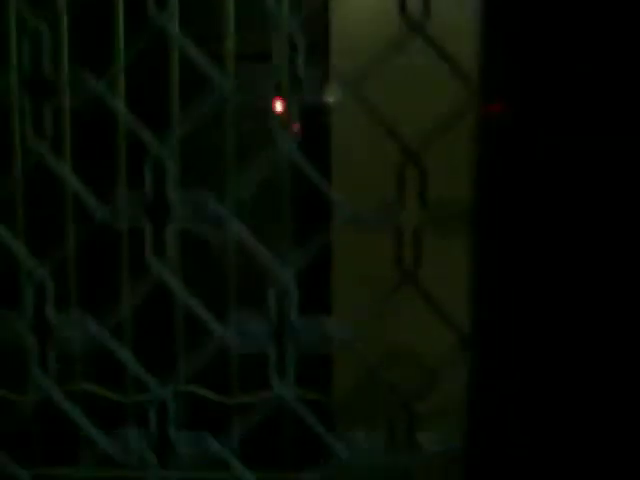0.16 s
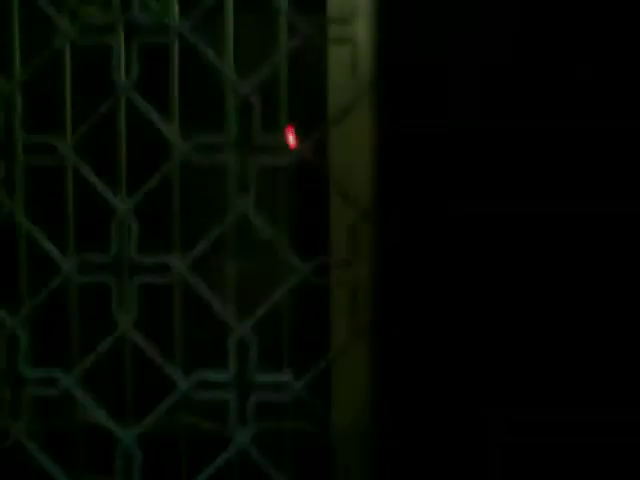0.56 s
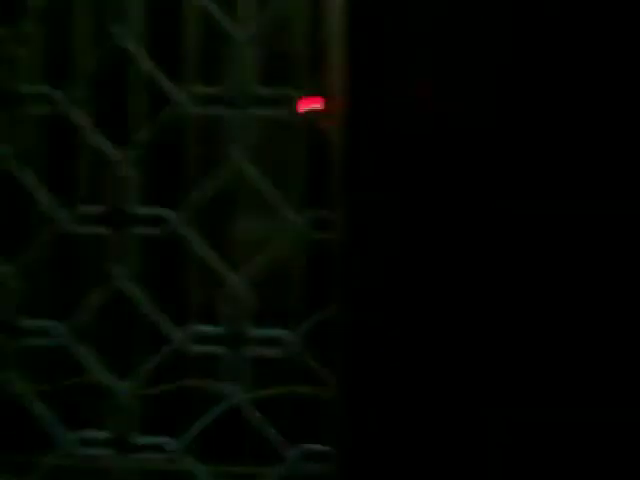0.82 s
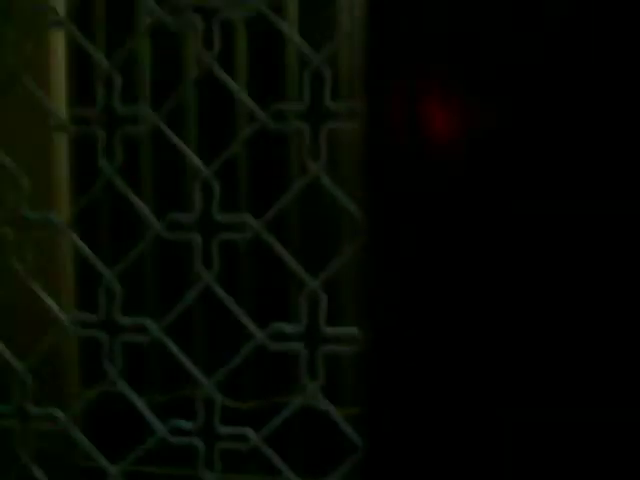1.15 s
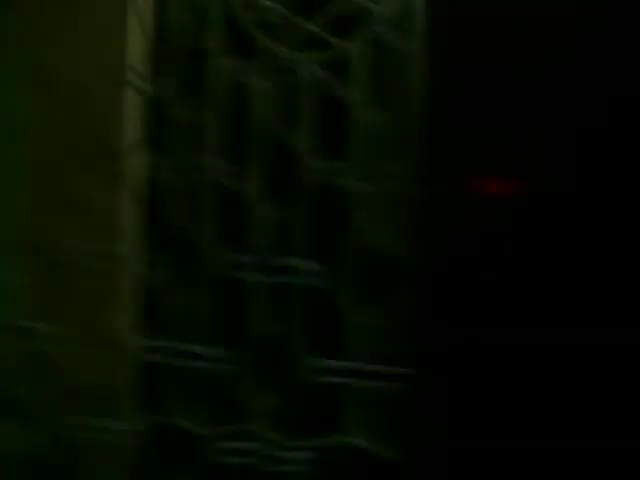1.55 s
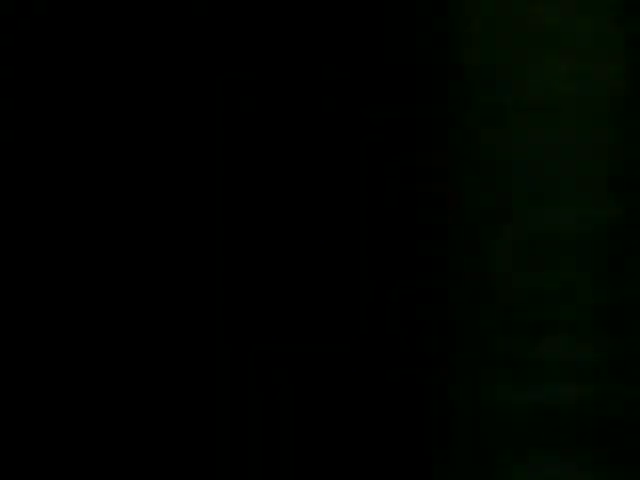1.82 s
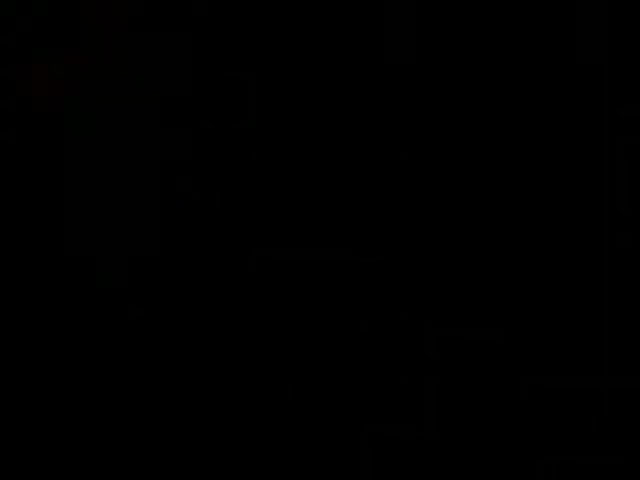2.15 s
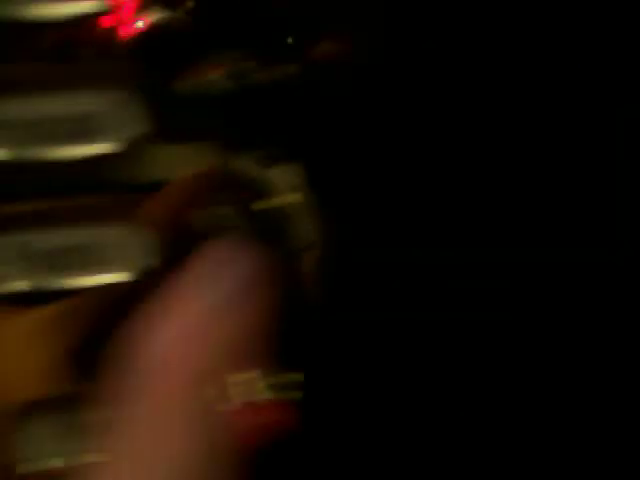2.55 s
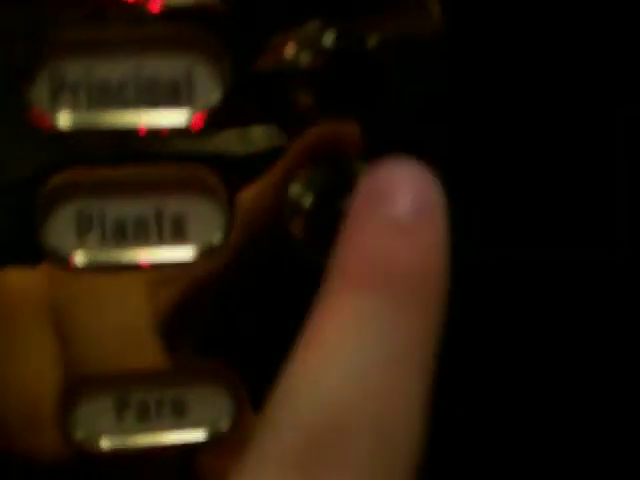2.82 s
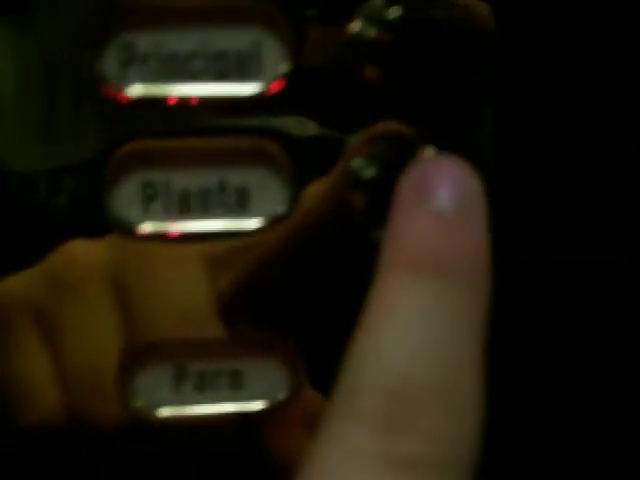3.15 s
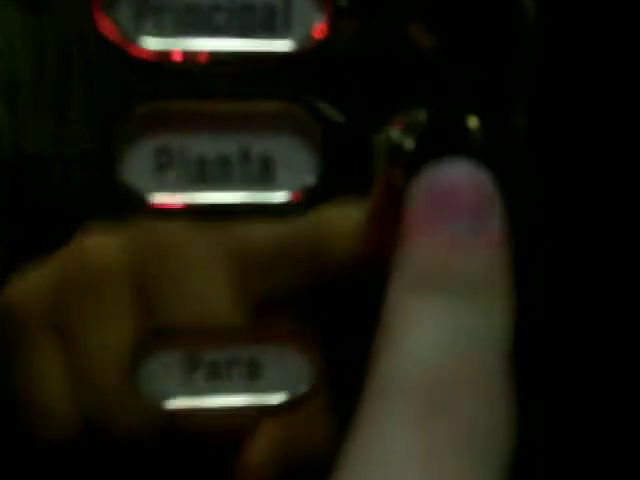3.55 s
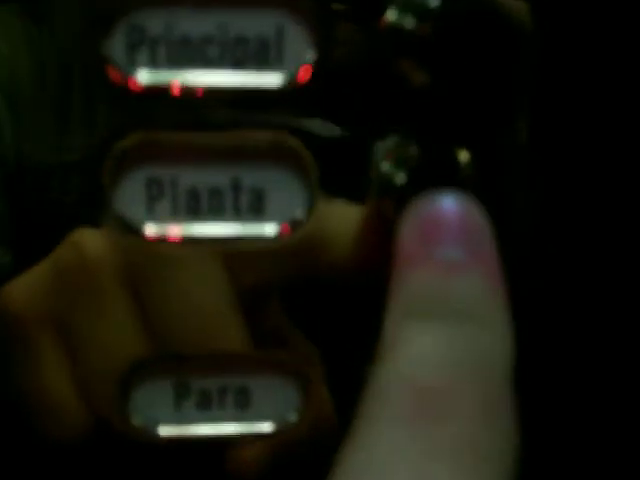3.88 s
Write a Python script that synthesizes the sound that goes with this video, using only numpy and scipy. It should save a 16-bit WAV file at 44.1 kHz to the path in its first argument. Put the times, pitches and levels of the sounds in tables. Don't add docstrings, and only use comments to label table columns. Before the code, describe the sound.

An old lift cabin rumbles low while its lattice gate rattles, thuds and scrapes shut; the noise dies to near quiet, then a button clicks and a relay clunks, heard close on a small, dull hand-held microphone.

```python
import sys
import numpy as np
from scipy import signal
from scipy.fft import rfft, irfft, next_fast_len
from scipy.io import wavfile
from scipy.ndimage import map_coordinates

SR = 44100
rng = np.random.default_rng(int(sys.argv[2]) if len(sys.argv) > 2 else 0)


def waveform_to_disk(signal):
    frames = np.transpose(np.atleast_2d(signal))
    scaled = np.clip(frames, -1, 1) * 32767
    samples = np.round(scaled).astype(np.int16)
    wavfile.write(sys.argv[1], SR, samples)


def rack_gain(trim_db):
    fader = np.asarray(trim_db, float)
    return 10 ** (fader / 20)


N = 176400

# centre in Hz, width in Hz, level in dB.
PANELS = [(221.6, 46, -5.5), (277, 6.2, 0), (330.7, 5, -3), (362.3, 2.6, -6), (395, 22, -8.5),
          (490, 61, -9), (580.6, 34, -7.5), (712, 71, -14), (810, 8.4, -7.5), (911, 130, -14.5),
          (1126, 12, -16)]
# centre in Hz, width in Hz, level in dB.
LOW_PANELS = [(53, 14, 2), (98, 11.6, 4), (136, 7.2, 0.5), (164.9, 3.5, 3.5)]
# start in seconds, peak in dB.
RELAY_HITS = [
    (3.389, -10.5),
    (3.407, -20.5),
    (3.428, -16.5),
]
# time in seconds, signed size in full scale, gain dip in dB.
BUMPS = [
    (0.16, -0.22, 0.5),
    (0.234, -.45, 4.5),
    (0.32, 0.47, 1),
    (0.488, -0.48, 2),
    (0.578, 0.11, 1),
    (0.605, -0.27, 0),
    (0.649, 0.11, -1),
    (0.833, 0.29, 1.5),
]


def unit(x):
    return x / np.sqrt(np.mean(x ** 2) + 1e-20)


def along(points, hz):
    f, v = np.transpose(points)
    return np.interp(np.log(hz + 1), np.log(f + 1), v)


def curve(rows):
    s, *cols = np.transpose(rows)
    return [np.interp(np.arange(N) / SR, s, v) for v in cols]


def wobble(rate_hz):
    knots = rng.standard_normal(int(N * rate_hz / SR) + 4)
    return map_coordinates(knots, [np.arange(N) * rate_hz / SR])


def filtered(x, response):
    m = next_fast_len(len(x) + SR // 2)
    return irfft(rfft(x, m) * response(np.fft.rfftfreq(m, 1 / SR)), m)[:len(x)]


def body(peaks):
    def response(f):
        return sum((-1) ** k * rack_gain(db) * 1j * f * w / (c * c - f * f + 1j * f * w)
                   for k, (c, w, db) in enumerate(peaks))
    return response


def noise(response):
    return unit(filtered(rng.standard_normal(N), response))


def dying(response, t60s, rise_s):
    t = np.arange(SR // 2) / SR
    burst = unit(filtered(rng.standard_normal(len(t)), response))
    hz, frame_s, z = signal.stft(burst, SR, nperseg=512)
    decay = rack_gain(-60 * frame_s / along(t60s, hz)[:, None])
    tail = signal.istft(z * decay, SR, nperseg=512)[1][:len(t)]
    return tail * (1 - np.exp(-t / rise_s))


def add(out, s, x):
    i = round(s * SR)
    out[i:i + len(x)] += x[:N - i]


def still_air():
    # frequency in Hz, level in dB per Hz.
    air_tone = [(88, -33), (150, -24.5), (415, -21.5), (735, -1), (913, -5), (4340, -13), (6000, -17),
                (7800, -74.5), (13200, -120)]
    return rack_gain(-48 + 0.19 * wobble(4.0)) * noise(lambda f: rack_gain(along(air_tone, f)))


def winding_hum():
    # centre in Hz, width in Hz, rms in dB.
    hum_bands = [(100, 14, -43), (277, 1.8, -63)]
    return sum(rack_gain(db) * noise(lambda f: body([(hz, w, 0)])(f) ** 2) for hz, w, db in hum_bands)


def cabin_sway():
    # time in seconds, level in dB.
    sway_level = [(0, -18), (.05, -22), (.4, -15.5), (.63, -10), (.73, -18.5), (.83, -12), (.9, -20.5),
                  (1.0, -14), (1.3, -18.5), (1.93, -25), (2.18, -14.5), (2.27, -20.5), (2.56, -19.5),
                  (2.66, -28.5), (3.1, -26), (3.27, -34.5), (3.45, -28), (4, -27.5)]
    # centre in Hz, width in Hz, level in dB.
    sway_modes = [(8.5, 10, -4), (19, 6.3, 2), (30.35, 7.1, -1), (57.7, 14.4, -6)]
    level_db = curve(sway_level)[0]
    return rack_gain(level_db) * noise(lambda f: body(sway_modes)(f) / (1 + (f / 85) ** 4))


def handling():
    case_tap = (.09287, 4800, .00022, 1.25, .0933, .00025, 1.2)
    bump_rise_s, bump_fall_s = 0.004, 0.0008
    t = np.arange(N) / SR
    tap_s, hz, half_s, size, push_s, push_half_s, push_size = case_tap
    tap = size * np.cos(2 * np.pi * hz * (t - tap_s)) * np.exp(-((t - tap_s) / half_s) ** 2)
    push_rise = ((t - push_s) / push_half_s) ** 2
    push_fall = (t - push_s) / (2 * push_half_s)
    push = push_size * np.exp(-np.where(t < push_s, push_rise, push_fall))
    bumps = sum(g * np.exp(-np.abs(t - s) / np.where(t < s, bump_rise_s, bump_fall_s)) for s, g, _ in BUMPS)
    return tap + push + bumps


def ticks():
    # start in seconds, peak in dB, pitch in Hz, t60 in seconds.
    tick_events = [(0.5796, -31, 1500, 0.0044), (0.604, -28.5, 1200, .004), (.627, -30, 2520, 0.015),
                   (.832, -27, 1710, 0.0077), (0.909, -15.5, 3830, 0.0062), (0.912, -13.5, 725, 0.013),
                   (0.9351, -11, 2410, 0.011), (.935, -22.5, 1580, 0.0098), (1.126, -34.5, 2960, 0.0081),
                   (1.7236, -36, 777, 0.03), (2.0206, -29, 1480, 0.019), (2.024, -30.5, 785, 0.072),
                   (2.254, -32, 2486, 0.044), (2.8638, -32, 2830, 0.014), (2.867, -37, 4100, 0.076),
                   (2.867, -34.5, 1300, 0.04), (2.8905, -29.5, 4600, 0.0065)]
    crack_t60_s, tail_db, tail_t60_s = 0.005, -18, 0.092
    out, t = np.zeros(N), np.arange(SR // 8) / SR
    for s, db, hz, t60 in tick_events:
        ring = 0.81 * rack_gain(-60 * t / t60) * np.sin(2 * np.pi * hz * t)
        crack = 0.55 * (rng.standard_normal(len(t)) + 2 * (t < .0002)) * rack_gain(-60 * t / crack_t60_s)
        wash = unit(filtered(rng.standard_normal(len(t)), body([(hz, hz, 0)])))
        tail = rack_gain(tail_db - 60 * t / tail_t60_s) * wash
        add(out, s, rack_gain(db) * (ring + crack + tail))
    return out


def scrapes():
    # peak time in seconds, rise in seconds, fall in seconds, level in dB, centre in Hz.
    swells = [(0.022, 0.034, 0.34, -41.5, 2490), (.146, 0.0054, 0.04, -30, 4060),
              (0.301, 0.039, 0.018, -38.5, 4170), (.42, 0.12, 0.16, -39.5, 3900),
              (0.898, .05, 0.18, -41, 3500), (1.029, 0.052, 0.063, -45, 3460),
              (1.24, 0.033, 0.073, -42.5, 2900), (1.776, 0.045, 0.075, -40.5, 3360),
              (2.017, 0.0074, 0.17, -43.5, 2340), (2.274, 0.058, 0.081, -38.5, 2610),
              (1.79, 0.019, 0.036, -43, 805), (2.299, 0.094, 0.2, -42, 864), (2.9, 0.024, 0.027, -41, 2020)]
    # centre in Hz, width in Hz, level in dB.
    lattice_modes = [(1370, 320, 5.5), (2100, 140, -0.5), (2440, 94, 4), (3500, 81, -14.5), (3966, 39, 0.5),
                     (4240, 91, -9.5)]
    lattice_db, lattice_fade_db_per_s, grit_db = 2.5, 7.8, 2
    out, t = np.zeros(N), np.arange(N) / SR
    ring = noise(lambda f: np.abs(body(lattice_modes)(f)) ** 0.71)
    for s, rise, fall, db, hz in swells:
        shape = np.where(t < s, np.exp(-((t - s) / rise) ** 2), np.exp(-np.abs(t - s) / fall))
        rub = noise(lambda f: body([(hz, 1.5 * hz, 0)])(f) ** 2)
        out += rack_gain(db) * shape * (rub + rack_gain(lattice_db - lattice_fade_db_per_s * s) * ring)
    return out * unit(rack_gain(grit_db * wobble(120)))


def singing():
    # start in seconds, length in seconds, pitch in Hz, peak in dB.
    swells = [(0, 0.055, 597, -25.5), (.05, 0.087, 100, -23), (.08, 0.088, 438.4, -19),
              (.07, 0.12, 191, -15.5), (0.097, 0.21, 277, -21), (0.144, 0.11, 395, -24.5),
              (.16, 0.035, 810, -45), (.16, 0.053, 568, -27), (.24, .13, 395, -22.5),
              (.26, 0.058, 98, -16.5), (0.255, 0.19, 277, -24), (0.331, 0.11, 387.5, -26.5),
              (0.342, 0.11, 598, -29), (0.334, 0.056, 729, -29), (0.403, 0.068, 277, -25),
              (.44, 0.15, 503, -36), (.57, 0.14, 453.7, -32), (.68, 0.099, 490, -33.5),
              (0.715, 0.28, 274.7, -31.5), (0.787, 0.044, 620, -39), (0.845, 0.06, 590, -36),
              (0.929, 0.068, 350, -34.5), (.94, 0.056, 158.7, -25), (0.937, 0.045, 676, -34.5),
              (1.002, 0.36, 699, -44), (1.02, 0.058, 540, -36.5), (1.07, 0.084, 277, -27),
              (1.15, 0.15, 166.8, -36), (1.439, 0.064, 367.4, -34.5), (.1, 0.15, 2424, -40),
              (.27, 0.056, 2444, -38), (0.374, 0.07, 2386, -43), (.14, 0.05, 4000, -34.5),
              (.14, .09, 1426, -36), (.3, 0.17, 1430, -46), (1.76, .07, 130.6, -28),
              (1.85, 0.054, 98, -22.5), (2.24, .06, 253.5, -35), (2.46, 0.033, 856, -43),
              (1.719, 0.057, 666, -41.5), (1.72, 0.039, 517, -40), (1.724, 0.045, 796, -39),
              (1.783, 0.039, 779, -40), (1.86, 0.042, 334, -30), (1.087, 0.046, 422.5, -32.5)]
    flutter_db = 3
    out = np.zeros(N)
    waver_rad = 0.7 * wobble(25)
    for s, length, hz, db in swells:
        t = np.arange(round(length * SR)) / SR
        level = rack_gain(db + flutter_db * wobble(50)[:len(t)]) * np.sin(np.pi * t / length) ** 0.83
        phase = 2 * np.pi * hz * t + waver_rad[round(s * SR):][:len(t)]
        add(out, s, level * np.sin(phase))
    return out


def thuds():
    # start in seconds, peak in dB, dullness in Hz, favoured panel in Hz.
    blows = [
        (.1, -10, 443, 277),
        (0.14, -11, 494, 395),
        (0.667, -19.5, 584, 490),
        (1.093, -22, 294, 277),
        (1.463, -12.5, 446, 136),
        (1.718, -24.5, 924, 712),
        (1.86, -15, 450, 330),
        (2.073, -14.5, 495, 395),
        (2.325, -15, 310, 277),
    ]
    # frequency in Hz, t60 in seconds.
    wash_t60s = [(60, 0.72), (300, 0.26), (1000, 0.33)]
    rise_s, ring_t60_s = 0.0068, 0.23
    wash_db, ring_db, low_db, favour_db = -11.5, -16.5, 2, 10.5
    out, t = np.zeros(N), np.arange(SR // 2) / SR
    for s, db, dull_hz, best_hz in blows:
        soft = lambda f: 1 / (1 + (f / dull_hz) ** 5)
        modes = 0
        for hz, _, g in LOW_PANELS[1:] + PANELS:
            near = abs(hz / best_hz - 1) < .08
            mode_db = g + (hz < 200) * low_db + favour_db * near + rng.normal(0, 1.4)
            modes = modes + rack_gain(mode_db) * soft(hz) * np.sin(2 * np.pi * hz * t + rng.uniform(-0.84, 1))
        ring = rack_gain(ring_db - 60 * t / ring_t60_s) * (1 - np.exp(-t / rise_s)) * modes
        wash = rack_gain(wash_db) * dying(lambda f: soft(f) * (f > 70), wash_t60s, rise_s)
        add(out, s, rack_gain(db) * (ring + wash))
    return out


def knock(events, tone, ring, t60s, wash_db, crack_db):
    waver_rad, rise_s, rebound_hz = 0.8, 0.002, 1300
    out, t = np.zeros(N), np.arange(SR // 2) / SR
    for k, (s, db) in enumerate(events):
        dull = lambda f: rack_gain(along(tone, f)) / (1 + (k > 0) * (f / rebound_hz) ** 4)
        modes = 0
        for hz, g, t60 in ring:
            level = rack_gain(g + 2.3 * wobble(41)[:len(t)] - 60 * t / t60)
            modes = modes + level * np.sin(2 * np.pi * hz * t + waver_rad * wobble(65)[:len(t)])
        modes = modes * (1 - np.exp(-t / rise_s))
        crack = (k == 0) * rack_gain(crack_db - 60 * t / 0.0018) * rng.standard_normal(len(t))
        wash = rack_gain(wash_db) * dying(dull, t60s, 0.00078)
        add(out, s, rack_gain(db) * (0.6 * modes + crack + wash))
    return out


def button():
    # start in seconds, peak in dB.
    press = [
        (3.0618, -19.5),
    ]
    # frequency in Hz, level in dB per Hz.
    button_tone = [(150, -34), (250, -19.5), (358, -16.5), (455, -16.5), (617, -5), (1430, -22),
                   (3480, -12), (5390, -22.5), (6000, -34), (7800, -69), (13200, -120)]
    # pitch in Hz, level in dB, t60 in seconds.
    button_ring = [(320, -7, 0.37), (610, -8, 0.31), (2870, -3.5, 0.051), (3780, 4, 0.021)]
    # frequency in Hz, t60 in seconds.
    button_t60s = [(300, 0.56), (1500, 0.1), (5000, 0.2)]
    return knock(press, button_tone, button_ring, button_t60s, wash_db=-11.5, crack_db=1)


def relay():
    # frequency in Hz, level in dB per Hz.
    relay_tone = [(88, -44), (150, -15.5), (500, -12.5), (807, -9), (1430, -19.5), (2200, -18),
                  (3500, -20.5), (5400, -34), (6200, -30), (7800, -120)]
    # pitch in Hz, level in dB, t60 in seconds.
    relay_ring = [(325, -18, 0.25), (651, -16.5, 0.8), (827, -0.5, 0.14), (1043, -7, 0.31),
                  (956, -9.5, 0.25)]
    # frequency in Hz, t60 in seconds.
    relay_t60s = [(200, 0.17), (900, 0.4), (2000, 0.27), (5500, 0.23)]
    return knock(RELAY_HITS, relay_tone, relay_ring, relay_t60s, wash_db=-8.5, crack_db=6)


def jolt():
    jolt_hz, jolt_db, jolt_t60_s = 19, -9, 0.95
    swing_hz, swing_db, swing_s = 42.4, -17, 0.06
    out, t = np.zeros(N), np.arange(SR) / SR
    shudder = -rack_gain(jolt_db - 60 * t / jolt_t60_s) * np.sin(2 * np.pi * jolt_hz * (t + 0.014))
    shudder = shudder * (1 - np.exp(-t / 0.0031))
    swing = rack_gain(swing_db) * t / swing_s * np.exp(-t / swing_s) * np.cos(2 * np.pi * swing_hz * t)
    add(out, RELAY_HITS[0][0], shudder + swing)
    return out


def gate_and_rumble():
    # time in seconds, rumble level in dB, gate rattle over it in dB.
    drive = [(0, -25.5, 3.5), (.05, -24, -0.5), (.12, -20.5, 2.5), (.3, -18.5, -3), (.5, -23.5, -5),
             (.73, -31.5, -3), (1.12, -20, -11.5), (1.39, -30, -10), (1.63, -31, -14.5),
             (1.92, -32.5, -3.5), (2.5, -42.5, -2), (2.96, -42, -3.5), (3.09, -49, 8.5), (3.23, -49.5, 1),
             (3.42, -46, 4.5), (4, -48, -4)]
    # frequency in Hz, level in dB per Hz.
    shaft_tone = [(90, -35.5), (150, -7), (300, -9.5), (600, -11.5), (1000, -24.5), (2500, -38),
                  (5000, -120)]
    shaft_db, lumpy_db = -0.5, 2.34
    level_db, rattle_db = curve(drive)
    panel_noise = noise(lambda f: np.abs(body(PANELS)(f)) ** 1.78)
    shaft_noise = rack_gain(shaft_db) * noise(lambda f: rack_gain(along(shaft_tone, f)))
    lumps = rack_gain(lumpy_db * wobble(12) + 1.4 * wobble(40))
    rattle = rack_gain(rattle_db) * unit((panel_noise + shaft_noise) * lumps)
    low_noise = noise(lambda f: body(LOW_PANELS)(f) / (1 + (f / 200) ** 6))
    boom = unit(low_noise * rack_gain(0.2 * wobble(21)))
    return rack_gain(level_db) * (boom + rattle)


def scene():
    background = still_air() + winding_hum() + cabin_sway() + handling()
    contacts = ticks() + scrapes() + singing() + thuds()
    controls = button() + relay() + jolt()
    return (background + contacts + controls + gate_and_rumble())[None]


def low_pass(x):
    return signal.sosfilt(signal.butter(12, 16500, fs=SR, output="sos"), x)


def record(dry):
    recover_s, top_hz, offset, clip = 0.08, 5520, 0.0022, 0.72
    t = np.arange(N) / SR
    duck_db = sum(db * (t > s) * np.exp(-np.abs(t - s) / recover_s) for s, _, db in BUMPS)
    x = filtered(dry[0] * rack_gain(-duck_db), lambda f: 1 / (1 + (f / top_hz) ** 30)) + offset
    x = x / (1 + np.abs(x / clip) ** 24) ** (1 / 24)
    return low_pass(x[None])


dry = scene()
out = record(dry)
waveform_to_disk(out)
```